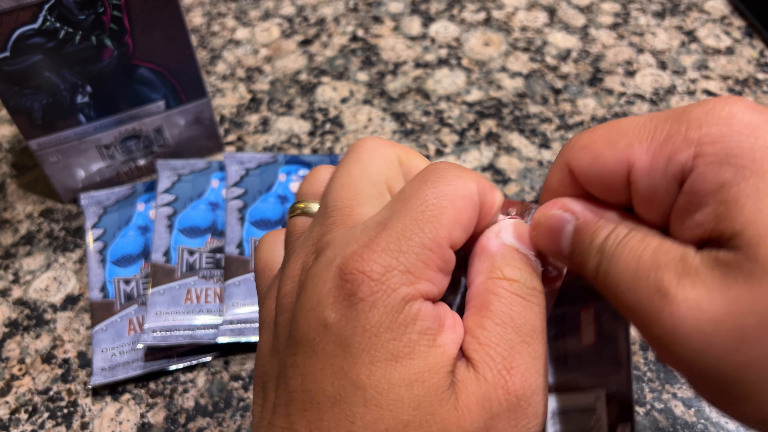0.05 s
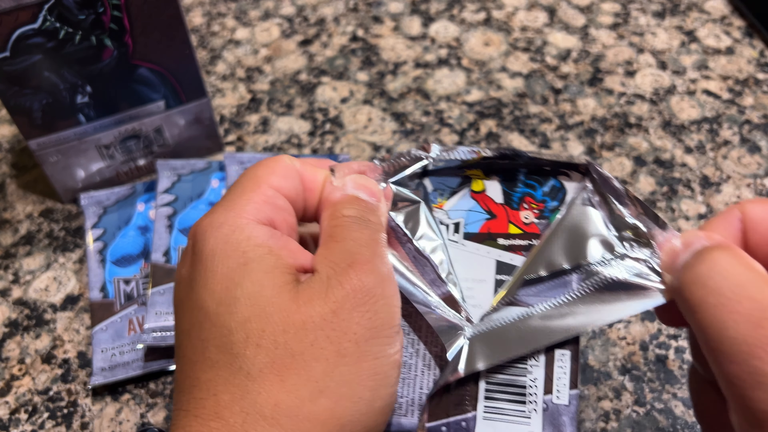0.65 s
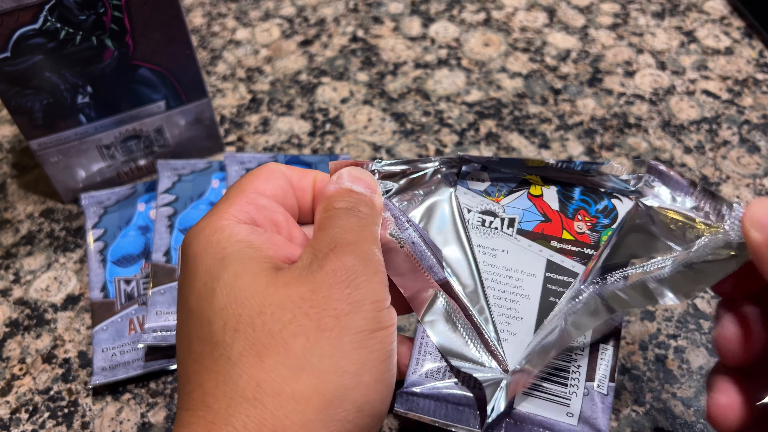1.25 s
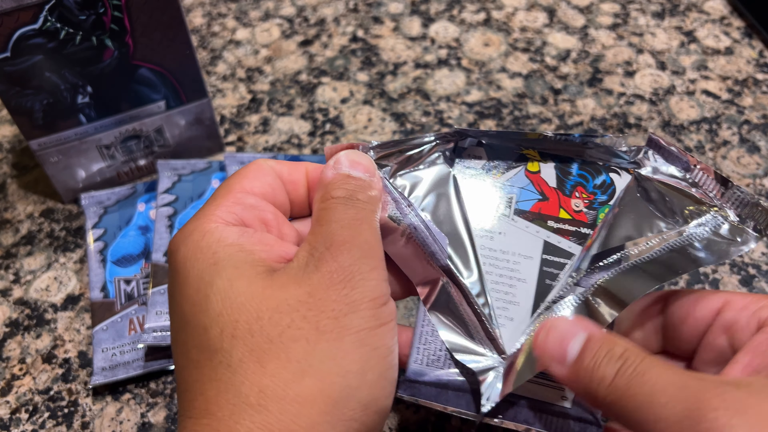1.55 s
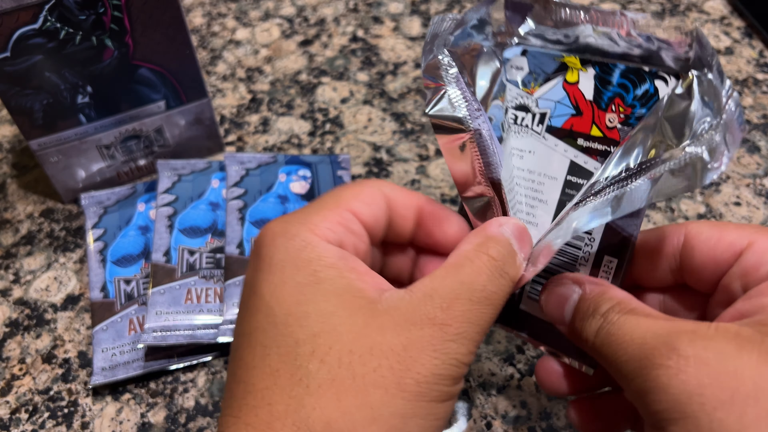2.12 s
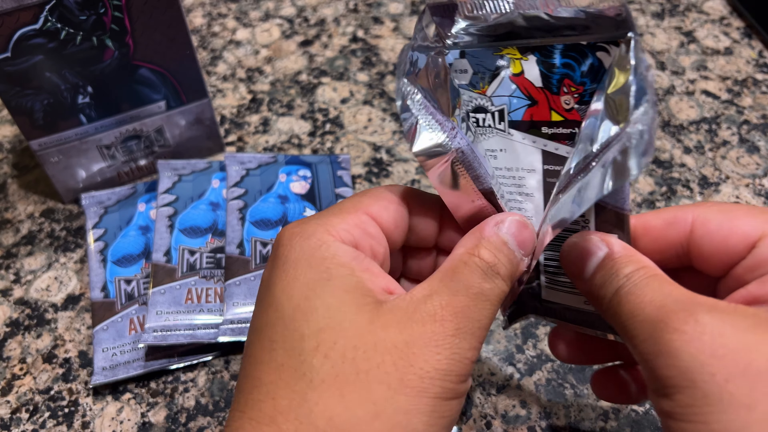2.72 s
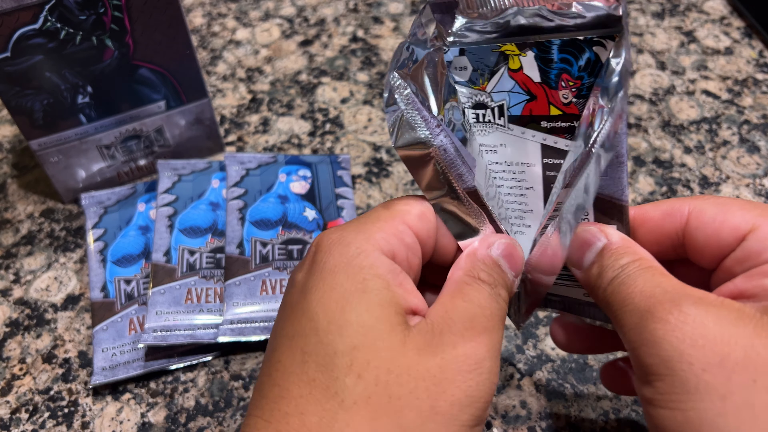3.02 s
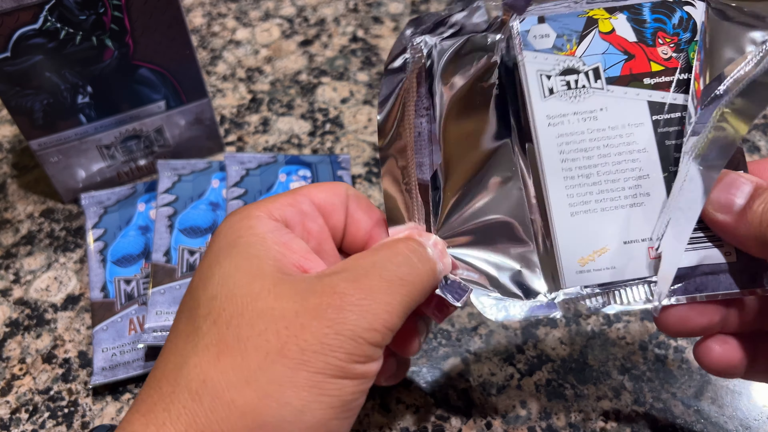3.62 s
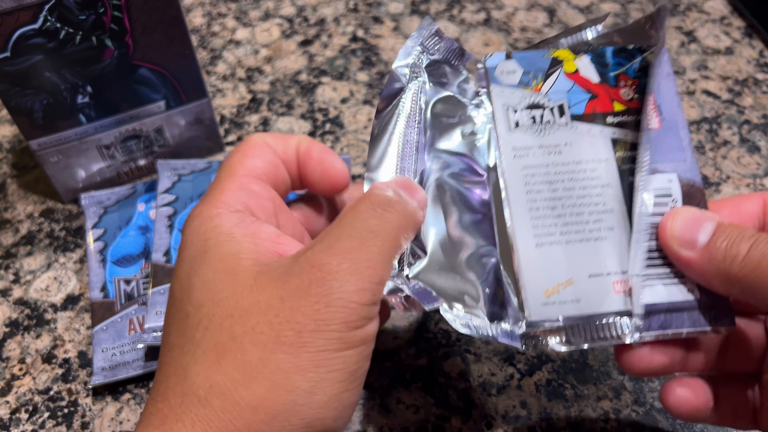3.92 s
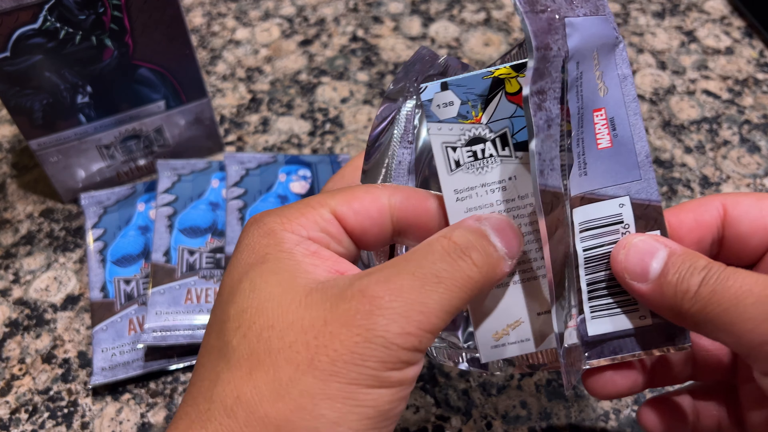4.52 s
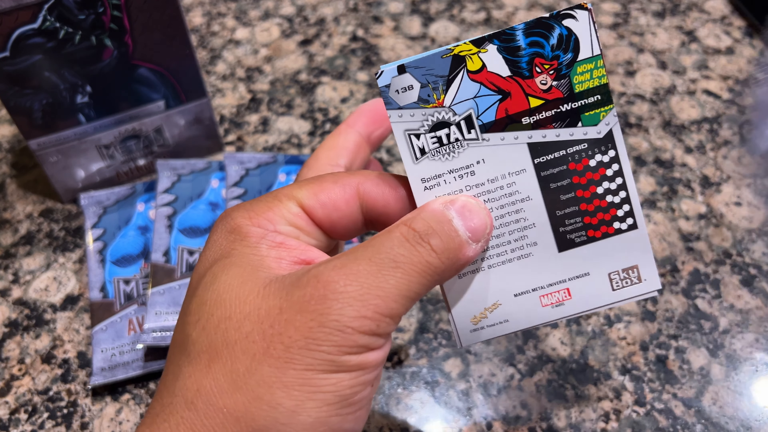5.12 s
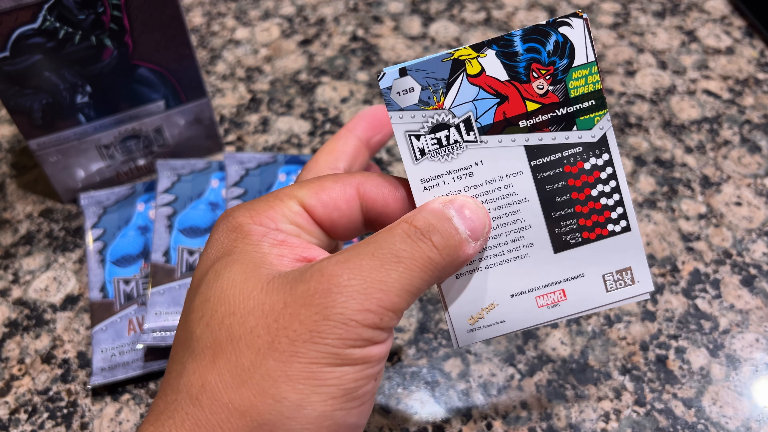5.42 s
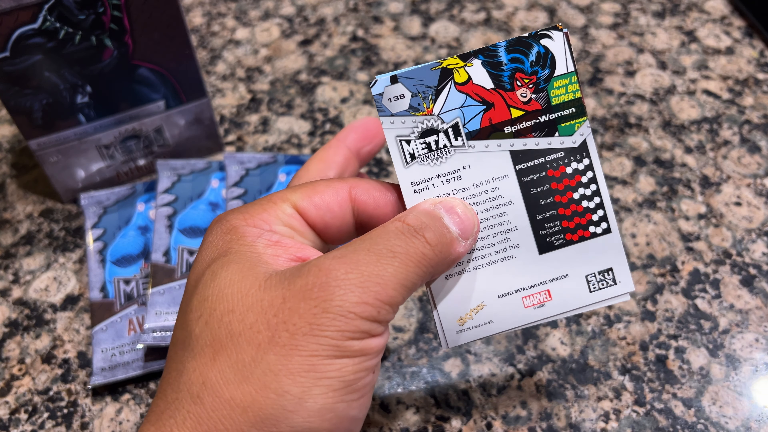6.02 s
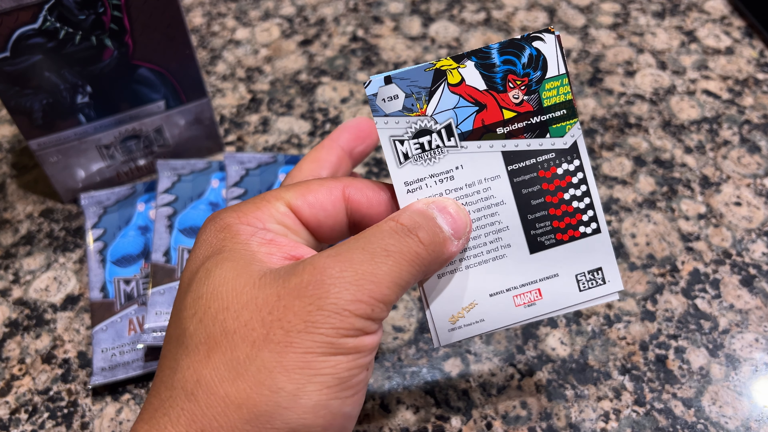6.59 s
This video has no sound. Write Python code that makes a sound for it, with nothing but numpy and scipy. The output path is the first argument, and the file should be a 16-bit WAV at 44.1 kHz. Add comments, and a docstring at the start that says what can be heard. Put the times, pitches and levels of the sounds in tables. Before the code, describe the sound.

Close to the microphone, a foil wrapper snaps, squeaks briefly and tears open with a dense crackle. Fingers crinkle it lightly for a couple of seconds before a second bright rip runs along the seam, followed by hollow pops of flexing foil. The crinkling thins out, trading cards scrape softly free, and a few last ticks sound over the faint hiss of a small room.

```python
"""A foil card pack is torn open over a stone counter, close to two microphone ports.
Over a faint room hiss, creases buckle with sharp snaps and taut film squeaks. A first crackling tear
runs from 0.2 to 0.95 s, broad panels popping in its second half; quieter finger crinkling follows.
At 3.1 s the seam rips further in a zip and two short tugs. The loose sheet flexes, and near 5 s
the cards scrape out. Throughout, the pack resonates and a small room answers."""
import sys
import numpy as np
from scipy import signal
from scipy.fft import rfft, irfft
from scipy.io import wavfile
from scipy.ndimage import uniform_filter1d

SR = 44100
rng = np.random.default_rng(int(sys.argv[2]) if len(sys.argv) > 2 else 0)


def wav_out(sig):
    """Save sig, one row per channel (or a flat mono array), as 16-bit PCM at SR to the path in sys.argv[1]."""
    wavfile.write(sys.argv[1], SR, np.round(np.clip(np.atleast_2d(sig).T, -1, 1) * 32767).astype(np.int16))


N = 297675


def amp(db):
    return 10 ** (np.asarray(db) / 20)


def unit_rms(x):
    return x / np.sqrt(np.mean(abs(x) ** 2) + 1e-20)


def curve_at(points, hz):
    """Linear interpolation on a log-frequency axis."""
    knot_hz, value = np.transpose(points)
    return np.interp(np.log(hz + 1), np.log(knot_hz + 1), value)


def add(mix, start_s, sound):
    """Superposition: a sound joins the mix at its onset."""
    part = mix[:, max(0, round(start_s * SR)):][:, :sound.shape[-1]]
    part += sound[..., :part.shape[-1]]


def noise_pair(size, apart):
    """Partial coherence: two channels share one noise and take a second in opposite phase."""
    common, side = rng.standard_normal((2, size))
    return unit_rms(np.array([common + apart * side, common - apart * side]))


def noise_band(lo_hz, hi_hz, size):
    """Band-limited noise of unit RMS."""
    bandpass = signal.butter(2, [lo_hz, hi_hz], "bandpass", fs=SR, output="sos")
    return unit_rms(signal.sosfilt(bandpass, rng.standard_normal(size)))


# spectrum of the room air: frequency_hz, level_db
AIR_SPECTRUM = [(25, -14.5), (140, 0), (250, -12.5), (850, -6.5), (1180, -2.5), (1600, -14), (2700, -22),
                (7400, -19.5), (11000, -50.5)]
# its slow drift: time_s, level_db
AIR_DRIFT = [(1.5, -64.5), (2.601, -70), (5.5, -62.5), (6.299, -66.5), (6.6, -62.5)]
def air(lean_db=3.0):
    """Ambient noise: a hiss that swells and sinks slowly, stronger on the left."""
    spectrum = amp(curve_at(AIR_SPECTRUM, np.fft.rfftfreq(N, 1 / SR)))
    hiss = unit_rms(irfft(rfft(noise_pair(N, 0.84)) * spectrum, N))
    level_db = np.interp(np.arange(N) / SR, *np.transpose(AIR_DRIFT))
    return hiss * amp(level_db) * amp([[lean_db], [-lean_db]])


def gestures(rows, attack_share, build_db, release_s, settle_db=-120., settle_s=.05):
    """Incoherent sources add in power: gives the joint amplitude and power-weighted spectral tilt."""
    t = np.arange(0, N, 32) / SR
    power, tilt_sum = np.full(len(t), 1e-14), 0
    for start_s, length_s, db, tilt in rows:
        progress = np.clip((t - start_s) / length_s, 0, 1)
        after_s = np.maximum(t - start_s - length_s, 0)
        attack = np.minimum(progress / attack_share, 1)
        release = np.maximum(np.exp(-after_s / release_s), amp(settle_db) * np.exp(-after_s / settle_s))
        row_power = (attack * amp(db + build_db * (progress - .5)) * release) ** 2
        power += row_power
        tilt_sum += row_power * tilt
    return [np.interp(np.arange(N) / SR, t, v) for v in (np.sqrt(power), tilt_sum / power)]


def crackle(pull, tilt, spectrum, per_s, spread_db, grain_s, yield_db, patchy_db, gain_db):
    """Yielding: lightly pulled foil only rubs; past yield_db it breaks into tiny random bursts."""
    sizes = amp(spread_db * np.minimum(rng.exponential(1, N), 3.5))
    impulses = sizes * (rng.random(N) < per_s / SR)
    burst_power = signal.lfilter([1], [1, -np.exp(-2 / (grain_s * SR))], impulses ** 2)
    burst_power /= uniform_filter1d(burst_power, size=2600) + 1e-9
    yielded = pull / (pull + amp(yield_db))
    grains = noise_pair(N, 0.19) * np.sqrt(yielded * abs(burst_power) + 1 - yielded)
    hz, frame_s, frames = signal.stft(grains, SR, nperseg=256, noverlap=192)
    frame_yield, frame_tilt = (np.interp(frame_s * SR, np.arange(N), v) for v in (yielded, tilt))
    # random patches in frequency and time give each burst its own colour
    patches = uniform_filter1d(rng.standard_normal(frames.shape[1:]), size=5, axis=0)
    patch_db = patchy_db * unit_rms(uniform_filter1d(patches, size=4, axis=1)) * frame_yield
    colour = amp(curve_at(spectrum, hz)[:, None] + octaves(hz)[:, None] * frame_tilt + patch_db)
    frames = frames * colour / np.sqrt(np.mean(colour ** 2, axis=0))
    return signal.istft(frames, SR, nperseg=256, noverlap=192)[1][:, :N] * pull * amp(gain_db)


def octaves(hz):
    """Octaves from 4 kHz, the pivot of the spectral tilt."""
    return np.log2(np.clip(hz, 700, 14000) / 4000)


# what the foil radiates, in crackle and snaps alike: frequency_hz, level_db
FOIL_SPECTRUM = [(30, -43), (170, -21.5), (330, -8), (680, -12.5), (1000, -2.5), (1500, -3), (3000, -3),
                 (4500, 0), (6500, -7), (8400, 3), (9800, 0.5), (11000, -10), (12500, -13), (15500, -10),
                 (16500, -26.5)]
# the first tear (0.2 to 0.95 s), then finger crinkling: start_s, length_s, level_db, tilt_db_per_octave
FOIL_PULLS = [(0, 0.044, -47, -0.5), (.1, 0.1, -47.5, 0.5), (.2, 0.053, -28.5, 0), (.305, 0.155, -32, -1.5),
              (.49, 0.098, -27, -1.5), (.725, 0.084, -35.5, -3), (.835, 0.14, -37.5, -4),
              (1.14, 0.055, -50, -4.5), (1.26, 0.038, -49, -5), (1.525, 0.089, -56, -3),
              (1.625, 0.081, -51, 0.5), (1.77, 0.03, -54, -2.5), (1.925, 0.21, -61.5, -2),
              (2.155, 0.058, -43.5, 1), (2.25, 0.13, -52, 0.5), (2.57, 0.023, -52.5, -2),
              (2.685, 0.069, -52, 1), (2.76, 0.23, -55.5, 2), (2.935, 0.15, -43, -0.5),
              (3.335, 0.088, -30.5, -5), (3.465, 0.044, -42, -3.5), (3.555, 0.13, -46.5, -3),
              (3.69, 0.078, -48.5, -2), (3.8, 0.087, -47, -2.5), (3.89, 0.14, -57.5, -1.5),
              (4.17, 0.199, -52.5, -4), (4.61, 0.14, -59.5, 0), (4.785, 0.3, -51.5, -1),
              (5.28, 0.082, -61, -4.5), (5.515, 0.091, -62, -3.5)]
def tear_and_crinkle(lightest_db=-51.5):
    """Fracture and buckling: foil crackles as it first tears, then crinkles; it settles after each pull."""
    pull, tilt = gestures(FOIL_PULLS, attack_share=0.28, build_db=1.5, release_s=.017,
                          settle_db=-8.5, settle_s=0.092)
    bursts = crackle(pull, tilt, FOIL_SPECTRUM, per_s=1000, spread_db=3.5,
                     grain_s=.0008, yield_db=-54, patchy_db=4, gain_db=-2.0)
    # even the lightest pull sets off a few separate ticks
    ticks = crackle(np.minimum(pull, amp(lightest_db)), tilt, FOIL_SPECTRUM, per_s=58, spread_db=3.0,
                    grain_s=0.0011, yield_db=-84, patchy_db=6, gain_db=-6.)
    return bursts + ticks + hollow(pull, tilt)


def hollow(pull, tilt, gain_db=-22.5, db_per_tilt=-2.8):
    """Cavity resonance: the pack drones as its foil is pulled, more so when broad, dull folds move."""
    return noise_band(200, 365, N) * pull * amp(gain_db + db_per_tilt * tilt)


# creases giving way: start_s, level_db, tilt_db_per_octave, facet_hz
CREASE_SNAPS = [(0.025, -30, 2.5, 2150), (0.0519, -24, 4, 3360), (0.122, -29, 9.5, 7000),
                (0.1433, -27.0, 1.5, 1980), (0.1781, -24.5, 2.5, 1820), (0.2146, -15, 2, 2240),
                (0.2545, -29, 2.5, 2970), (0.2712, -27.5, 0, 1550), (0.3512, -25.5, 2.5, 2240),
                (0.4149, -25.0, 0.5, 5710), (0.434, -23.5, 1, 2860), (0.4429, -26, -6.5, 1680),
                (0.5316, -19.0, 0.0, 1610), (0.6044, -24, 1.5, 1490), (0.6117, -24, 4, 2970),
                (0.6388, -28.5, -2, 5480), (0.7227, -32, -0.5, 950), (0.7404, -28, -5.5, 1120),
                (0.7483, -28.5, 2.5, 1750), (0.7738, -29.0, -11.5, 2970), (0.856, -28, 4, 1160),
                (0.8646, -21.5, 3.5, 950), (0.8997, -27, 2.5, 1030), (0.9336, -18.0, 1.5, 2740),
                (0.9444, -20.5, -3.5, 3360), (0.951, -23.5, 5.5, 950), (0.9702, -24, -1, 950),
                (1.153, -32.5, -0.5, 3650), (1.2887, -36, 0, 3100), (1.446, -50, 2.5, 1490),
                (1.5476, -36, 3.5, 2860), (1.5948, -40.5, -0.5, 2240), (1.67, -33, 2, 4470),
                (1.6847, -33, 2, 4290), (1.78, -39.5, 1.5, 2860), (1.7912, -40, -1.5, 3230),
                (1.8408, -44.5, -7.5, 2630), (1.944, -36.5, 9, 3960), (1.949, -37.5, 0.0, 4120),
                (2.0297, -37.0, 4, 4470), (2.084, -29, 3, 4850), (2.0953, -30, 1, 4660),
                (2.1486, -37.5, 3.0, 4470), (2.1749, -35.5, 2.5, 6000), (2.1967, -39.5, 1.5, 2740),
                (2.267, -42, -0.5, 2430), (2.3858, -38, -1.0, 4290), (2.7314, -45.5, 1.5, 5710),
                (2.9237, -40.5, 7, 1320), (3.0031, -30.0, 2.5, 3650), (3.024, -20.5, 1.5, 4470),
                (3.0548, -29.5, 4.5, 3360), (3.124, -23.5, 5.0, 2400), (3.2697, -30.5, -2, 1750),
                (3.3213, -23.5, -3, 1900), (3.336, -11.5, -4.0, 1750), (3.3959, -17.5, -3.5, 1610),
                (3.4065, -15, -1, 1320), (3.4149, -22, -4, 1550), (3.5316, -32.5, -4.0, 950),
                (3.5754, -33.5, -6, 2240), (3.601, -31.5, -0.5, 1750), (3.6052, -33.5, 0.5, 2430),
                (3.6395, -22.5, -2.0, 5950), (3.6545, -26, 0.5, 950), (3.7158, -35, -1.5, 1160),
                (3.819, -24, -1.5, 2740), (3.8469, -26.5, 0.5, 3360), (3.869, -38, -2.5, 2970),
                (3.8787, -35.5, 2.0, 1550), (4.248, -42, -3, 1680), (4.451, -50, 0.5, 4500),
                (4.6277, -32.5, 4, 4700), (4.721, -30.5, 1.5, 4660), (4.9183, -42.5, -4.5, 1900),
                (5.16, -45, -4.5, 2740), (5.2974, -42.5, 0, 5710), (5.3542, -43.5, 1.5, 7000),
                (5.5916, -49.0, 0.5, 5950)]
def snaps(swell_s=.0009, fade_s=.0015, flutter_db=-20.0, flutter_s=0.004, ring_db=8.0, ring_octaves=.29):
    """Snap-through buckling: a crease gives way in a few milliseconds and rings its facet."""
    size, lead_s, delay_at_1khz_s = 4096, .005, .001
    t, hz = np.arange(size) / SR - lead_s, np.fft.rfftfreq(size, 1 / SR)
    # bending waves deliver the treble first
    dispersion = np.exp(-4j * np.pi * delay_at_1khz_s * np.sqrt(1000 * hz))
    out = np.zeros((2, N))
    for start_s, db, tilt, facet_hz in CREASE_SNAPS:
        stretch = np.exp(0.23 * rng.standard_normal() - .04 * tilt)  # bright creases are quicker
        age = (t - swell_s / 2) / stretch
        buckle = np.exp(-(age / np.where(age < 0, swell_s, fade_s)) ** 2)
        flutter = (age > 0) * amp(flutter_db) * np.exp(-abs(age) / flutter_s)
        burst = rfft(noise_pair(size, 0.17) * (buckle + flutter))
        burst_power = np.mean(abs(burst) ** 2, axis=0)
        burst /= np.sqrt(uniform_filter1d(burst_power, size=90))  # the buckling itself has no pitch
        facet_db = ring_db * np.exp(-(np.log2((hz + 1) / facet_hz) / ring_octaves) ** 2)
        colour = amp(curve_at(FOIL_SPECTRUM, hz) + tilt * octaves(hz) + facet_db)
        snap = unit_rms(irfft(burst * colour * dispersion))
        add(out, start_s - lead_s, snap * amp(db) * np.sqrt(lead_s * SR / size))
    return out


# stretched film first giving way: start_s, fade_s, level_db, pitch_hz
FILM_SQUEAKS = [(0.111, .012, -44.5, 2300), (0.1427, .002, -25, 2070), (0.169, .002, -34, 2590),
                (0.2147, 0.0022, -9.5, 2170), (0.234, .002, -23.5, 2300)]
def squeaks(rise_s=0.00076, sag_per_s=4., half_band_hz=430.0, rough=0.32):
    """Frictional slip: taut film sounds a short, rough note that sags in pitch."""
    t = np.arange(SR // 16) / SR
    out = np.zeros((2, N))
    for start_s, fade_s, db, hz in FILM_SQUEAKS:
        tone = np.sin(2 * np.pi * np.cumsum(hz * np.exp(-sag_per_s * t)) / SR)
        rasp = rough * noise_band(hz - half_band_hz, hz + half_band_hz, len(t))
        envelope = np.minimum(t / rise_s, np.exp((rise_s - t) / fade_s))
        add(out, start_s, amp(db) * envelope * (tone + rasp))
    return out


# the sheet flexing as a whole: start_s, level_db, sway_relative_db
SHEET_FLAPS = [(0.58, -36, -21), (0.764, -38, -29.5), (.787, -39, -33.5), (.866, -34.5, -34),
               (.899, -32.5, -30.5), (.955, -28, -19.5), (.969, -27.5, -24.5), (3.169, -34, -32.5),
               (3.337, -35, -22.5), (3.408, -20, -16), (3.5, -32.5, -23), (3.577, -32.5, -20.5),
               (3.607, -34, -17), (3.641, -26, -12.5), (3.716, -33, -23.5), (3.803, -40, -12.5),
               (3.82, -29.5, -7.5), (4.983, -33.5, -23), (5.161, -50, -28), (5.299, -46, -30)]
def flaps(panel_hz=292, rise_s=0.0034, sag=0.25, sag_s=0.0075, sway_s=0.009, sway_hz=60., glide_s=.008):
    """Flexural vibration: a broad panel pops over with falling pitch, then the sheet sways lower still."""
    t = np.arange(SR // 6) / SR
    out = np.zeros((2, N))
    for start_s, db, sway_db in SHEET_FLAPS:
        hz = panel_hz * 2 ** (0.07 * rng.uniform(-1.1, 1))
        pop_cycles = np.cumsum(hz * (1 - sag + 2 * sag * np.exp(-t / sag_s))) / SR
        pop = np.sin(2 * np.pi * pop_cycles) + 0.55 * noise_band(0.52 * hz, 1.5 * hz, len(t))
        pop *= t / rise_s * np.exp(1 - t / rise_s)
        sway_cycles = np.cumsum(sway_hz + (hz - sway_hz) * np.exp(-t / glide_s)) / SR
        sway = np.sin(2 * np.pi * sway_cycles) + .65 * noise_band(65, 170, len(t))
        sway *= t / sway_s * np.exp(1 - t / sway_s)
        add(out, start_s, amp(db) * (pop + amp(sway_db) * sway))
    return out


# what the taut seam radiates: frequency_hz, level_db
SEAM_SPECTRUM = [(300, -23), (750, -28.5), (1400, -5.5), (2300, -3), (2900, -4), (4400, 2), (6600, -13.5),
                 (8400, 0.5), (9000, -1), (9800, -1.5), (11500, -13.5), (15600, -15), (16100, -37)]
# pulls that rip the seam further: start_s, length_s, level_db, tilt_db_per_octave
SEAM_PULLS = [(3.142, 0.051, -22.5, 4.5), (3.185, 0.07, -18.5, 2.5), (3.276, 0.044, -27, 0.5),
              (3.328, 0.035, -21.5, -0.5)]
def seam_rip():
    """Peeling fracture: the seam catches, runs in bursts dense enough to fuse, and stops short."""
    peel, tilt = gestures(SEAM_PULLS, attack_share=.2, build_db=-0.5, release_s=0.0058)
    return crackle(peel, tilt, SEAM_SPECTRUM, per_s=2300, spread_db=2.0,
                   grain_s=0.0004, yield_db=-23, patchy_db=4.0, gain_db=-1.5)


def cards(peak_s=4.99, width_s=0.017, level_db=-45.5, chatter_db=2):
    """Sliding friction: the cards scrape out of the wrapper in one chattering swell."""
    swell = np.exp(-((np.arange(N) / SR - peak_s) / width_s) ** 2)
    chatter = unit_rms(uniform_filter1d(rng.standard_normal(N), size=200))
    return noise_band(1070, 2430, N) * swell * amp(level_db + chatter_db * chatter)


# modes of the pack with its stiff cards inside: frequency_hz, gain_db
PACK_MODES = [(1000, -4.5), (1245, 2.5), (1360, 5.5), (1610, 1), (3350, 5), (4430, 4), (8400, -1.5)]
def pack_body(x, width_hz=27.0, width_share=0.0083):
    """Modal resonance: the pack lifts or cuts narrow bands and rings briefly after every crease."""
    hz = np.fft.rfftfreq(N, 1 / SR)
    lift = sum((amp(db) - 1) / (1 + 2j * (hz - mode_hz) / (width_hz + width_share * mode_hz))
               for mode_hz, db in PACK_MODES)
    return irfft(rfft(x) * (1 + lift), N)


# phase between the ports: frequency_hz, left_lead_rad
PORT_PHASE = [(1750, 0), (3000, 1.5), (5100, 1.5), (6400, .4), (7500, 1.3), (8600, -.3), (10200, -3.1),
              (13700, -9.4), (15500, -12.6)]
# balance between the ports: frequency_hz, left_minus_right_db
PORT_BALANCE = [(100, 1.5), (1000, -0.5), (5000, 4), (8500, 0.4)]
def ports(x):
    """Two-point reception: each port gets the near sound with its own phase and strength."""
    hz = np.fft.rfftfreq(N, 1 / SR)
    left = np.exp(.5j * curve_at(PORT_PHASE, hz)) * amp(curve_at(PORT_BALANCE, hz) / 2)
    return irfft(rfft(x) * np.array([left, 1 / left]), N)


# reverberation time of the room: frequency_hz, t60_s
ROOM_DECAY = [(200, 0.57), (1400, 0.11), (4000, 0.2), (9000, 0.27), (15000, 0.21)]
def room(x, early_db=-14.5, early_s=0.0047, tail_db=-15.0):
    """Reverberation: early reflections between hands and counter, then a short diffuse tail."""
    hz, frame_s, frames = signal.stft(noise_pair(SR // 2, .6), SR, nperseg=256)
    fade = amp(-60 * frame_s / curve_at(ROOM_DECAY, hz)[:, None])
    onset = np.clip(frame_s / .008, 0, 1)
    tail = signal.istft(frames * fade * onset, SR, nperseg=256)[1]
    tail *= amp(tail_db) / np.linalg.norm(tail[0])
    t = np.arange(tail.shape[1]) / SR
    early = noise_pair(len(t), 0.76) * t * np.exp(-2 * t / early_s)
    early *= amp(early_db) / np.linalg.norm(early[0])
    return signal.fftconvolve(x, early + tail, axes=1)[:, :N]


def scene():
    """Source and filter: every sound of the pack passes through its modes; air and room add to it."""
    hiss = air()
    sources = tear_and_crinkle() + snaps() + squeaks() + flaps() + seam_rip() + cards()
    direct = ports(pack_body(sources))
    return hiss + direct + room(direct)


def record(dry, cutoff_hz=16500):
    """Soft saturation rounds off the hardest cracks; a low-pass filter limits the band."""
    lowpass = signal.firwin(301, cutoff_hz, window=("kaiser", 9), fs=SR)
    return signal.oaconvolve(np.tanh(dry), lowpass[None], "same")


dry = scene()
out = record(dry)
wav_out(out)
```